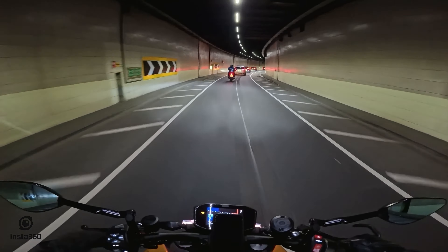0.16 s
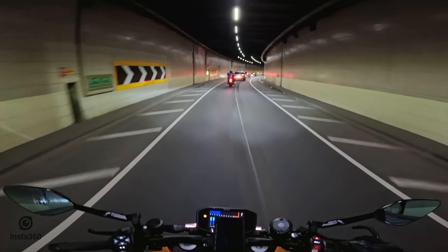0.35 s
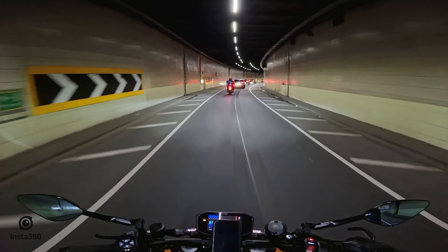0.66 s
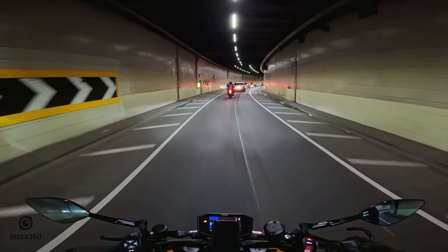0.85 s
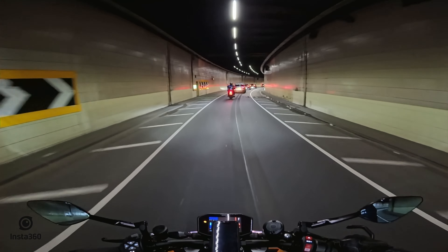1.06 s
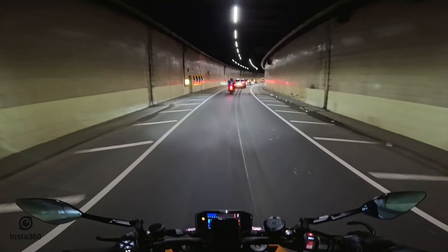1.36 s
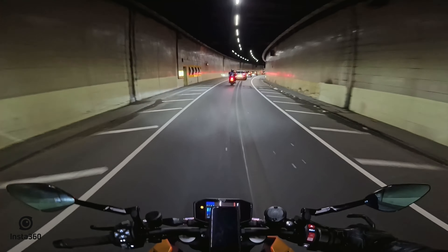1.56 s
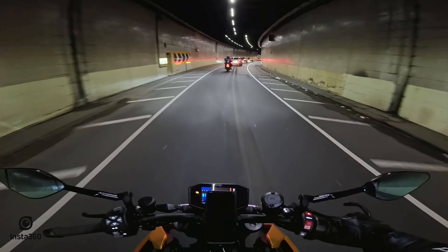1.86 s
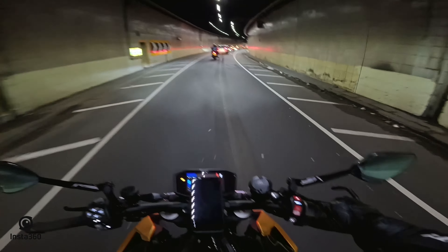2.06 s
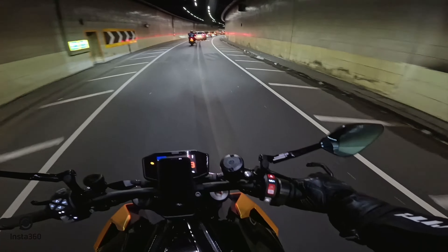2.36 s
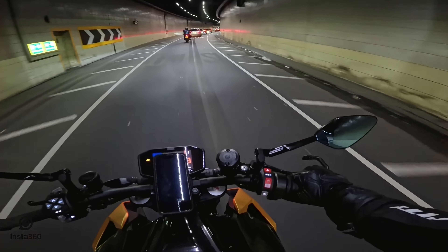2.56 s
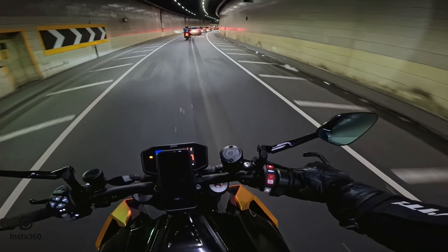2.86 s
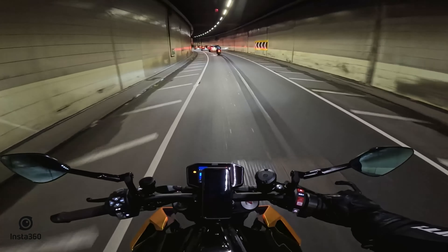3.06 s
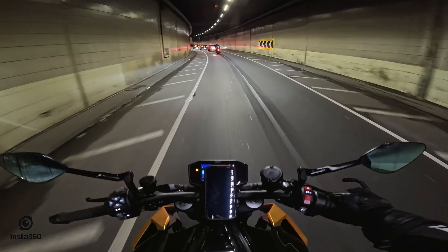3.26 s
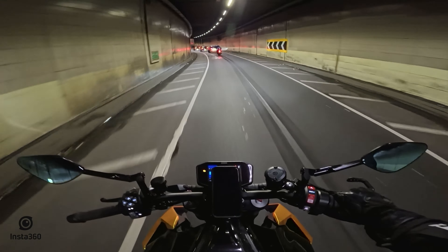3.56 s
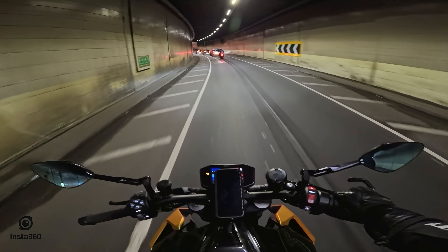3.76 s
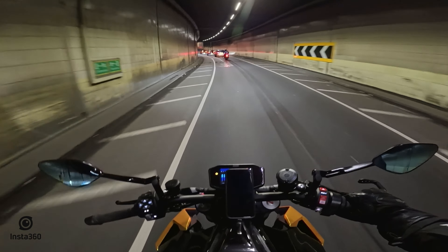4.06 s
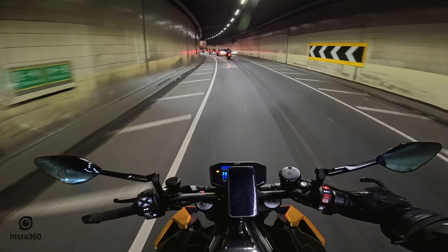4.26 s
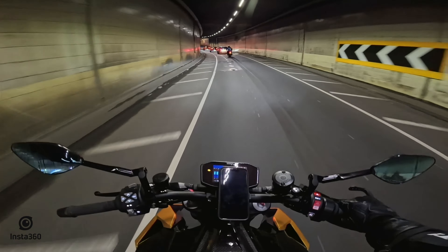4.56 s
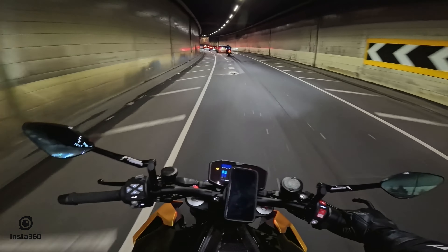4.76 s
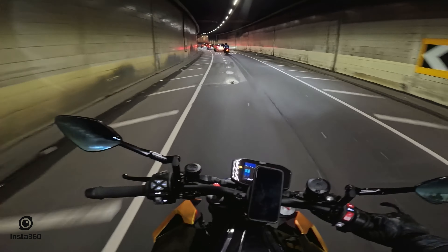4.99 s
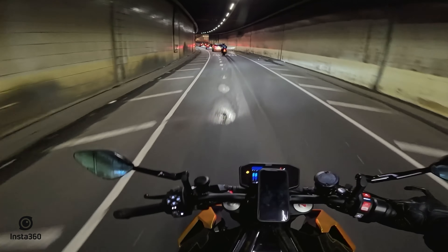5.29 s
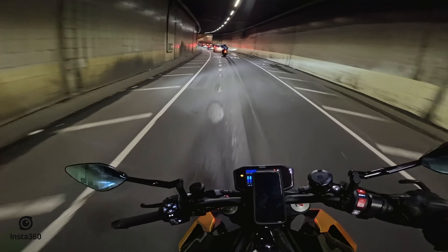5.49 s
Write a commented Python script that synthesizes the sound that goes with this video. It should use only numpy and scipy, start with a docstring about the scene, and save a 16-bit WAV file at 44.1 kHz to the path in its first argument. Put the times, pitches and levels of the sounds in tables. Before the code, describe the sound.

Close onboard stereo sound of a motorcycle in an echoing tunnel. With throttle shut, the exhaust growl slides down, rough and wavering, with crackles, small bangs and quick wall echoes. It grows softer and drier before an abrupt step up in pitch about halfway. Then a solid, buzzing drone holds, barely rising, over blurred low roar and airy road hiss, with peaks clipped hard.

```python
"""A three-cylinder motorcycle with an open exhaust, heard from the saddle inside a road tunnel.
It first coasts with falling revs and pops in the pipe; at three seconds the revs jump up and a steady pull begins.
The note is a sum of tones locked to the engine cycle, one cylinder louder; cracks and pops are puffs of noise.
All along, blurred firings make the tunnel roar and filtered noise the hiss; the recorder clips the peaks."""
import sys
import numpy as np
from scipy import signal
from scipy.fft import rfft, irfft, next_fast_len
from scipy.io import wavfile
from scipy.ndimage import uniform_filter1d

SR = 44100
rng = np.random.default_rng(int(sys.argv[2]) if len(sys.argv) > 2 else 0)


def unload_wav(signal):
    """Save mono or channel-first audio to the path in sys.argv[1] as 16-bit WAV at rate SR, clipped to [-1, 1]."""
    wavfile.write(
        sys.argv[1],
        SR,
        np.round(np.clip(np.atleast_2d(signal).T, -1, 1) * 32767).astype(np.int16),
    )


N = 248283
MID_HZ = 28  # engine cycles per second at which the level laws are stated


def undb(db):
    """dB to gain."""
    return 10 ** (np.asarray(db) / 20)


def level(x, db):
    """Scale to an rms level."""
    return x * undb(db) / np.sqrt(np.mean(x ** 2))


def colour(x, points):
    """Shape a spectrum by (Hz, dB) points, straight lines over log frequency."""
    hz, db = np.transpose(points)
    size = next_fast_len(N)
    f = np.arange(size // 2 + 1) * SR / size + 1
    gain = undb(np.interp(np.log(f), np.log(hz), db))
    return irfft(rfft(x, size) * gain, size)[:N]


def ring(x, hz, width):
    """One resonance, gain 1 at the centre, width in Hz."""
    return signal.lfilter(*signal.iirpeak(hz, hz / width, fs=SR), x)


def noise():
    """White noise of unit rms."""
    return rng.standard_normal(N)


def walk(rate):
    """Random levels held 1 / rate s and slewed twice; spread near 1."""
    hold = int(SR / rate)
    steps = np.repeat(rng.standard_normal(N // hold + 1), hold)
    return 4 / 3 * uniform_filter1d(uniform_filter1d(steps, hold), hold)[:N]


def play(rows):
    """Columns of a curve table, one value a sample."""
    s, *columns = np.transpose(rows)
    return [np.interp(np.arange(N) / SR, s, c) for c in columns]


def follow(law, hz, throttle):
    """Level in dB of a layer at these revs, blended between throttle shut and open."""
    (shut_db, shut_slope), (open_db, open_slope) = law
    coasting_db = shut_db + shut_slope * (hz - MID_HZ)
    pulling_db = open_db + open_slope * (hz - MID_HZ)
    return (1 - throttle) * coasting_db + throttle * pulling_db


def beats(turns, scatter_db, jitter_s):
    """A pulse at each whole turn, with its own size and a slip in time."""
    at = np.flatnonzero(np.diff(np.floor(turns)) > 0)
    slip, size = rng.standard_normal((2, len(at)))
    at = at + (jitter_s * SR * slip).astype(int)
    out = np.zeros(N)
    np.add.at(out, np.clip(at, 0, N - 1), undb(scatter_db * size))
    return out


def burst(pulses, decay_s):
    """Envelope that jumps at each pulse and dies away exponentially."""
    return signal.lfilter([1], [1, -np.exp(-1 / (decay_s * SR))], pulses)


def puff(pulses, click_db, rise_s):
    """A dull thump inside a rounded puff of gas noise; click_db sets the thump against the noise."""
    dull = signal.butter(2, 1500, fs=SR, output="sos")
    thump = signal.sosfilt(dull, np.roll(pulses, int(rise_s * SR)))
    swell = burst(burst(pulses, rise_s), rise_s) * np.e / (rise_s * SR)  # peak 1 per unit pulse
    return undb(click_db) * thump + swell * noise()


# The coast in the tunnel. Each row: time in seconds, engine cycles in Hz, even firing in dB.
COAST = [(0, 31.77, -12.5), (.2, 31.05, -16.5), (.5, 29.56, -10.5), (.75, 28.57, -10.5), (1, 27.79, -8.5),
         (1.07, 27.45, -17), (1.17, 27.04, -8), (1.5, 25.9, -14), (1.92, 24.39, -12), (2.06, 23.8, -16.5),
         (2.17, 23.66, -17), (2.27, 23.05, -14), (2.6, 22.4, -18), (2.98, 21.87, -15.5)]
# The pull under throttle. Each row: time in seconds, engine cycles in Hz, even firing in dB,
# then the level in dB of multiples 2, 4, 5, 6, 8, 12 and 13 of the cycle, which open_tones() plays.
PULL = [(3.0, 28.69, -10.5, -23, -25.5, -19, -22, -20, -33, -24),
        (3.1, 28.86, -10.5, -25.5, -21.5, -17, -24.5, -19.5, -33.5, -25),
        (3.351, 29.1, -14, -25.5, -25, -12.5, -29.5, -27, -41.5, -26),
        (3.55, 29.47, -15, -23, -22, -18, -26.5, -17, -22, -31.5),
        (3.75, 29.75, -13.5, -22.5, -19, -19, -25, -26, -33, -25.5),
        (3.941, 30.14, -16, -17, -20.5, -18.5, -20, -29.5, -37, -29),
        (4.221, 30.38, -16, -18, -18, -18, -16.5, -23.5, -42.5, -22.5),
        (4.4, 30.54, -15.5, -22, -20.5, -17.5, -15.5, -24.5, -41, -24),
        (4.6, 30.87, -17.5, -19, -24, -16, -15, -31.5, -25, -35),
        (4.8, 30.94, -18, -18, -24, -14, -27, -25, -27, -47.5),
        (5.04, 31.3, -19, -17.5, -22, -14.5, -22, -21.5, -25, -43),
        (5.122, 31.07, -11.5, -17, -26.5, -12, -27, -27, -31, -40.5),
        (5.179, 31.0, -20, -20.5, -16.5, -14, -18.5, -30, -28.5, -43.5),
        (5.3, 31.07, -13, -18.5, -22.5, -12, -26, -30, -26.5, -31),
        (5.42, 31.2, -22, -20, -14.5, -16, -20, -24.5, -25.5, -33),
        (5.52, 31.3, -14.5, -22, -16, -18.5, -20, -24.5, -22, -31),
        (5.63, 31.09, -16.5, -24, -19.5, -18.5, -21.5, -23.5, -21.5, -44)]
START_TURNS, PULL_JUMP_TURNS = .73, .72  # place in the engine cycle at the start, and its jump as the pull begins
SPUTTER_ENDS_S, SPUTTER_FADE_S = 2.5, .12  # the pipe goes quiet once it runs out of fuel


def ride():
    """Revs, cycle position, even firing level, throttle (0 to 1) and fuel left in the pipe (1 to 0)."""
    hz, even_db = play(COAST + [row[:3] for row in PULL])
    throttle, = play([(COAST[-1][0], 0), (PULL[0][0], 1)])
    turns = np.cumsum(hz) / SR + START_TURNS + PULL_JUMP_TURNS * (throttle > .5)
    t = np.arange(N) / SR
    fuel = 1 / (1 + np.exp((t - SPUTTER_ENDS_S) / SPUTTER_FADE_S))
    return hz, turns, even_db, throttle, fuel


# Steady air in the top octaves. Each row: frequency in Hz, relative level in dB per Hz.
AIR = [(5000, -10.5), (8000, 4), (12000, -5.5), (16000, -9.5)]
AIR_DB = -77.5


def air():
    """Steady noise shaped to the treble, far weaker at 2 kHz and below."""
    return level(colour(noise(), [(2000, -60.0)] + AIR), AIR_DB)


# Colour of the road and air hiss. Each row: frequency in Hz, relative level in dB per Hz.
HISS = [(290, -38), (500, -7), (604, -24), (750, -6), (1230, -11.5), (1720, -38), (2040, -24),
        (2690, -28.5), (3250, -26.5), (4660, -31), (7420, -41), (15100, -66), (16000, -78.5)]
# Its level, one row for throttle shut, one for open. Each row: level in dB at MID_HZ, slope in dB per Hz of revs.
HISS_LAW = [(-39.5, 0.94), (-42, 0.2)]
DRY_HISS_DB = -1  # change once the pipe is out of fuel


def hiss(hz, throttle, fuel):
    """Tyres and air: octave bands of noise that swell together and flicker alone."""
    swell = walk(3)
    bands = 0
    for centre_hz in 500 * 2. ** np.arange(6):
        flicker_db = 1.1 * swell + 1.2 * walk(14)
        bands = bands + ring(noise(), centre_hz, centre_hz * .7) * undb(flicker_db)
    dry_db = DRY_HISS_DB * (1.5 - np.maximum(fuel, throttle))
    return level(colour(bands, HISS), 0) * undb(follow(HISS_LAW, hz, throttle) + dry_db)


# Colour of the tunnel roar. Each row: frequency in Hz, relative level in dB per Hz.
ROAR = [(20, -31), (35, -22), (60, -3), (100, 1), (170, 1), (250, -4), (320, -9.5), (390, -11.5),
        (490, -21), (620, -21), (750, -33.5), (1200, -33), (2000, -45), (4000, -95)]
# The roar thins in the bass under throttle. Each row: frequency in Hz, gain in dB.
ROAR_OPEN = [(60, -4), (200, -4), (300, 0), (450, 2), (560, 0), (700, -2)]
# Its level, one row for throttle shut, one for open. Each row: level in dB at MID_HZ, slope in dB per Hz of revs.
ROAR_LAW = [(-15, 0.77), (-18, 0.074)]
TUNNEL_T60_S = 2.88  # decay rate of the echo tail, which is cut off after one second


def tunnel(hz, turns, throttle):
    """Many late returns of the exhaust, loosely timed, blur into a roar."""
    blurred = beats(3 * turns, scatter_db=4.0, jitter_s=.003)
    tail = rng.standard_normal(SR) * np.exp(-np.log(1000) * np.arange(SR) / SR / TUNNEL_T60_S)
    # firings played twice, second pass kept: the tunnel is already roaring at the start
    returns = signal.fftconvolve(np.tile(blurred, 2), tail)[N:2 * N]
    roar = level(colour(returns, ROAR), 0)
    roar = (1 - throttle) * roar + throttle * colour(roar, ROAR_OPEN)
    return roar * undb(follow(ROAR_LAW, hz, throttle))


# Peak level of the steady tone, before a random waver. Each row: time in seconds, level in dB.
WHINE = [(0, -33), (.3, -31), (.7, -21.5), (1, -32), (2.3, -44), (2.7, -30.5), (2.9, -23.5), (2.97, -15.5),
         (3.05, -42), (5.63, -55)]
WHINE_HZ = 371.7  # perhaps the tread or the gears


def whine():
    """One sine whose pitch strays by about a hertz and whose level wavers."""
    phase = 2 * np.pi * np.cumsum(WHINE_HZ + walk(3)) / SR
    return undb(play(WHINE)[0] + 2 * walk(6)) * np.sin(phase)


# Pops and once-a-cycle cracks of the coasting exhaust, loud and faint.
# Each row: time in seconds, level in dB before POP_TRIM_DB.
POPS = [(0.0247, -18), (0.0374, -17.5), (0.1016, -25), (0.184, -21.5), (0.196, -19), (0.3281, -29.5),
        (0.3599, -29.5), (0.3929, -30.5), (0.4593, -27), (0.5281, -32), (0.5617, -36), (0.63, -34.5),
        (0.6646, -38.5), (0.7002, -37.5), (0.734, -37), (0.7672, -25), (0.805, -34), (0.8403, -36),
        (0.8748, -38), (0.9102, -37.5), (0.9476, -35), (0.9822, -38.5), (1.019, -36.5), (1.0559, -28),
        (1.1297, -41), (1.1659, -28.5), (1.24, -35), (1.278, -30.5), (1.3523, -34), (1.3907, -29.5),
        (1.4689, -36), (1.505, -27.5), (1.5856, -37), (1.6236, -27.5), (1.7036, -38), (1.7413, -38),
        (1.8241, -37), (1.8656, -29), (1.9466, -32.5), (1.989, -34.5), (2.073, -40.5), (2.1131, -36),
        (2.2692, -41), (2.3135, -36.5), (2.371, -31), (2.4602, -34), (2.9931, -43)]
# Colour of the pops. Each row: frequency in Hz, relative level in dB per Hz.
POP = [(400, -3), (1000, 5), (1900, -6), (3400, -9.5), (5000, -15), (7500, -25), (11000, -40), (15000, -52)]
POP_DELAY_S, POP_TRIM_DB = .001, -1.5
SPUTTER_DB = -46  # small pops, before POP_TRIM_DB
ECHO_S, ECHO_DB = .024, -5  # each pop comes back once from the tunnel wall
WASH_S, WASH_DB = .03, -27  # and trails off in a short wash


def pops(turns, fuel):
    """Small chance pops while fuel lasts, and the listed ones, each a puff of gas with one wall echo."""
    s, pop_db = np.transpose(POPS)
    pulses = fuel * undb(SPUTTER_DB) * beats(3 * turns, scatter_db=3.0, jitter_s=0.004)
    pulses[((s + POP_DELAY_S) * SR).astype(int)] = undb(pop_db)
    pulses = pulses + undb(ECHO_DB) * np.roll(pulses, int(ECHO_S * SR))
    wash = undb(WASH_DB) * burst(pulses, WASH_S) * noise()
    bangs = colour(puff(pulses, click_db=17, rise_s=.0008) + wash, POP)
    return undb(POP_TRIM_DB) * bangs / np.std(colour(noise(), POP))


# Colour of the exhaust crack. Each row: frequency in Hz, relative level in dB per Hz.
CRACK = [(400, -20), (800, 2), (1250, 1), (1900, -8), (2700, -15.5), (3400, -11.5), (5000, -22.5),
         (8000, -38), (14000, -63.5)]
# Its level under throttle. Each row: time in seconds, level in dB.
CRACK_PULL = [(3, -52), (3.5, -47.5), (3.9, -43.5), (4.4, -44), (4.75, -41), (5.1, -43), (5.63, -46)]
CRACK_COAST_DB, CRACK_COAST_SLOPE = -42.5, 1.4  # coasting, fuel left: dB at MID_HZ, dB per Hz of revs
CRACK_TURNS, PULL_CRACK_TURNS = -.02, .04  # crack's lead in the cycle, and the extra lead under throttle


def cracks(hz, turns, throttle, fuel):
    """Gas leaving the pipe once a cycle as a sharp puff, with a ring at 1250 Hz, and the pops."""
    place = turns + PULL_CRACK_TURNS * (throttle > .5) + CRACK_TURNS
    coast_db = CRACK_COAST_DB + CRACK_COAST_SLOPE * (hz - MID_HZ) + 20 * np.log10(fuel)
    crack_db = np.where(throttle > .5, play(CRACK_PULL)[0], coast_db)
    edge = colour(puff(beats(place, scatter_db=1.0, jitter_s=.0003), click_db=21.5, rise_s=.0014), CRACK)
    edge = level(edge + undb(1.5) * ring(edge, 1250, 140), 0)
    return edge * undb(crack_db) + pops(place, fuel)


PIPE_LATE_TURNS, PIPE_EARLY_TURNS, PIPE_LAG_ORDERS = .24, .41, .9


def held(turns, order):
    """Cycle phase of one multiple under load: the lowest tones come earliest in the cycle."""
    lag = PIPE_LATE_TURNS - PIPE_EARLY_TURNS * np.exp(-(order - 2) / PIPE_LAG_ORDERS)
    return turns - lag / order


def tone(turns, order, waver_db, drift, spread=0.004, rate=6.):
    """One multiple of the cycle; passing walls make it swell and slide, and higher ones leave the pipe later."""
    lag = 0.21 + spread * order ** 2 + drift * np.sqrt(order) * walk(rate)
    return -np.sqrt(2) * undb(waver_db * walk(rate)) * np.cos(2 * np.pi * (order * turns - lag))


# Pipe colour with the throttle shut. Each row: frequency in Hz, level in dB against the louder cylinder.
SHUT = [(25, -8.5), (170, -0.5), (205, -11), (250, -2), (290, -11), (350, -17), (400, -16.5), (460, -24.5),
        (580, -25.5), (680, -34)]
# Strong tones of the coast. Each row: time in seconds, engine cycles in Hz (not played),
# level in dB of multiples 2, 4, 5 and 6 of the cycle.
COAST_TONES = [(0.0, 32.0, -14.5, -26, -31, -24), (0.06, 31.6, -16.5, -16, -18.5, -16),
               (0.16, 31.2, -16.5, -30, -36, -24.5), (0.25, 30.7, -16.5, -13, -19.5, -22.5),
               (0.33, 30.3, -15, -11, -25.5, -19), (0.73, 28.6, -24, -25.5, -14.5, -22.5),
               (0.84, 28.3, -13, -20.5, -28, -14), (0.97, 27.8, -29, -24.5, -22, -18.5),
               (1.23, 26.8, -16, -24.5, -17.5, -17), (1.29, 26.5, -19, -31.5, -25.5, -36),
               (1.56, 25.5, -19.5, -18.5, -13.5, -16), (1.63, 25.2, -17.5, -24, -17.5, -34),
               (1.81, 24.6, -19, -26, -15, -18), (2.3, 23.0, -28, -23.5, -22, -23.5),
               (2.8, 22.0, -25, -36.5, -36.5, -29.5), (2.98, 21.9, -18, -25, -32.5, -19.5)]


def shut_tones(turns, hz, lump_db):
    """Throttle shut: the louder cylinder's tones through a fixed pipe colour, rough and sliding."""
    pipe_hz, pipe_db = np.transpose(SHUT)
    weak = 0
    for k in (1, *range(7, 24)):
        gain = undb(np.interp(np.log(k * hz), np.log(pipe_hz), pipe_db))
        weak = weak + gain * tone(turns, k, waver_db=3.0, drift=0.08, spread=0.02047, rate=14.)
    strong = 0
    for k, db in zip((2, 4, 5, 6), play(COAST_TONES)[1:]):
        strong = strong + undb(db) * tone(turns, k, waver_db=2.5, drift=0.06, spread=0.015, rate=14.)
    return undb(lump_db) * weak + strong


# Weaker tones, throttle open. Each row: multiple of the cycle, level in dB against the louder cylinder.
OPEN = [(1, -9), (7, -23.5), (9, -17), (10, -13), (11, -14), (14, -17.5), (15, -33), (16, -25), (17, -23),
        (18, -26), (19, -20.5), (20, -19.5), (21, -30), (22, -28), (23, -28.5), (26, -35), (28, -29.5)]
# Extra level of those tones from multiple UPPER_FROM up. Each row: time in seconds, level in dB.
UPPER = [(3, -10), (3.3, -3), (3.8, -1), (4.8, 1), (5.63, -1.5)]
UPPER_FROM = 19


def open_tones(turns, lump_db):
    """Throttle open: the louder cylinder's tones, steadier and each at its own place in the loaded cycle."""
    upper_db, = play(UPPER)
    weak = 0
    for k, db in OPEN:
        gain = undb(db + (k >= UPPER_FROM) * upper_db)
        weak = weak + gain * tone(held(turns, k), k, waver_db=1.8, drift=0.02, rate=7.)
    strong = 0
    for k, db in zip((2, 4, 5, 6, 8, 12, 13), play(PULL)[2:]):
        strong = strong + undb(db) * tone(held(turns, k), k, waver_db=.6, drift=0.015)
    return undb(lump_db) * weak + strong


# The louder cylinder, one row for throttle shut, one for open.
# Each row: level in dB at MID_HZ, slope in dB per Hz of revs.
LUMP_LAW = [(-20, 0.51), (-21, 0.12)]
DRY_PIPE_DB = -5.5  # it softens by this once the pipe is out of fuel
NOTE_LEAD_TURNS = .09  # the low note arrives this much ahead in the cycle
NOTE_SLIP_TURNS_PER_S, NOTE_SLIP_FROM_S = .045, 3.15  # in the pull it slips behind the crack


def engine(hz, turns, even_db, throttle, fuel):
    """Three even firings a cycle, plus the tones that the loudest cylinder adds; rougher while coasting."""
    slip_s = np.maximum(np.arange(N) / SR - NOTE_SLIP_FROM_S, 0)
    turns = turns + NOTE_LEAD_TURNS - NOTE_SLIP_TURNS_PER_S * slip_s
    lump_db = follow(LUMP_LAW, hz, throttle) + DRY_PIPE_DB * (1 - np.maximum(fuel, throttle))
    pulling = throttle > .5
    even = tone(np.where(pulling, held(turns, order=3), turns), order=3, waver_db=0.6, drift=0.023)
    uneven = np.where(pulling, open_tones(turns, lump_db), shut_tones(turns, hz, lump_db))
    load = np.abs(2 * throttle - 1)  # the note drops out for an instant at the jump
    return load * (even * undb(even_db) + uneven)


# Side against mid, before SIDE_TRIM_DB. Each row: frequency in Hz, level in dB.
WIDTH = [(60, -39.5), (110, -15), (200, -10), (380, -8.5), (700, -6), (1290, -3), (2380, -2), (4400, -2),
         (8120, -1.5), (15000, -20.5)]
SIDE_TRIM_DB = -1.5
PORT_SHARE, PORT_LAG_S = 0.92, 0.0017  # power share of the side that is the centre sound itself, a moment later
PORT_FROM_HZ = 360  # the ports differ in time only above this
BALANCE_SHARE = 0.012  # left leans slightly louder
BLIP_DB, BLIP_S = 6.5, 0.37  # the roar and hiss of a throttle blip just before still die away


def scene():
    """Engine strongest in the centre; the sides are its late copy and a second draw of the surroundings."""
    hz, turns, even_db, throttle, fuel = ride()
    blip = undb(BLIP_DB * np.exp(-np.arange(N) / SR / BLIP_S))

    def surroundings():
        """One draw of roar, hiss, air, cracks and pops."""
        wash = blip * (tunnel(hz, turns, throttle) + hiss(hz, throttle, fuel))
        return wash + air() + cracks(hz, turns, throttle, fuel)

    mid, other = surroundings(), surroundings()
    mid = mid + whine() + engine(hz, turns, even_db, throttle, fuel)
    above = signal.butter(2, PORT_FROM_HZ, "high", fs=SR, output="sos")
    late = signal.sosfilt(above, np.roll(mid, int(PORT_LAG_S * SR)))
    spread = np.sqrt(PORT_SHARE) * late + np.sqrt(1 - PORT_SHARE) * other
    side = undb(SIDE_TRIM_DB) * colour(spread, WIDTH) + BALANCE_SHARE * mid
    return np.array([mid + side, mid - side])


def record(dry):
    """The recorder drops the deepest bass, clips at full scale and cuts the top."""
    bass_cut = signal.butter(2, 45, "high", fs=SR, output="sos")
    top_cut = signal.ellip(8, .2, 70, 16000, fs=SR, output="sos")
    lean = signal.sosfilt(bass_cut, dry)
    return signal.sosfilt(top_cut, np.clip(lean, -1, 1))


dry = scene()
out = record(dry)
unload_wav(out)
```